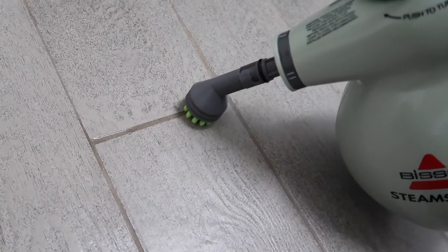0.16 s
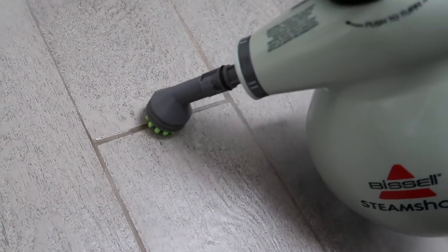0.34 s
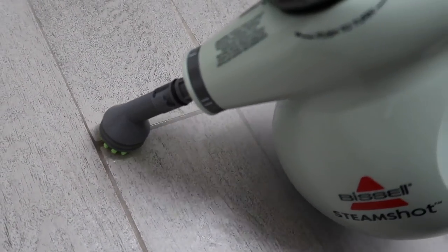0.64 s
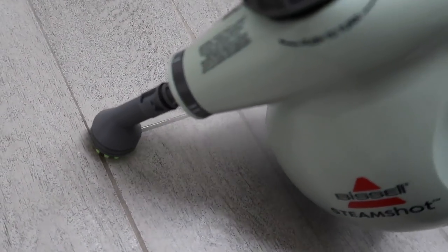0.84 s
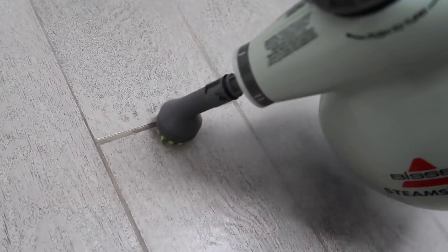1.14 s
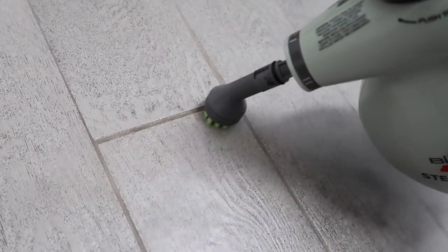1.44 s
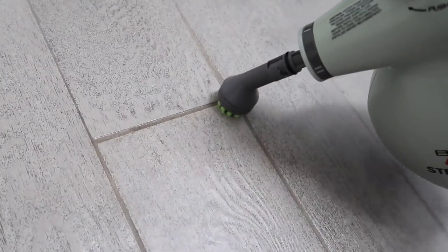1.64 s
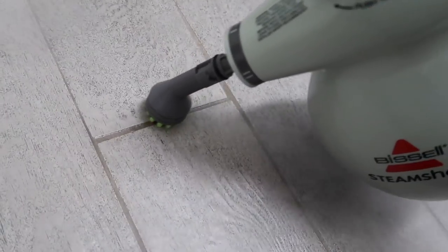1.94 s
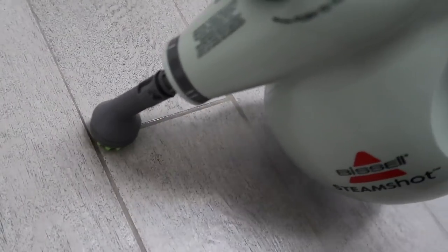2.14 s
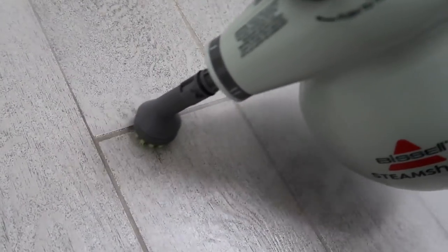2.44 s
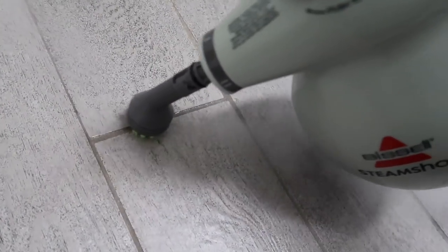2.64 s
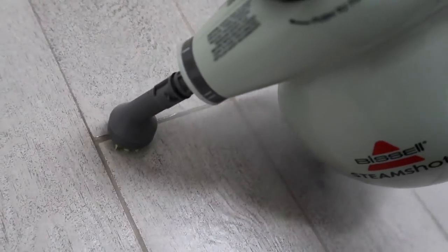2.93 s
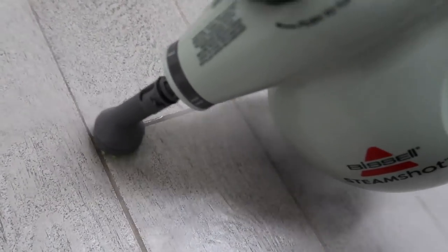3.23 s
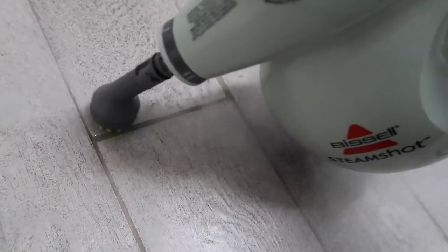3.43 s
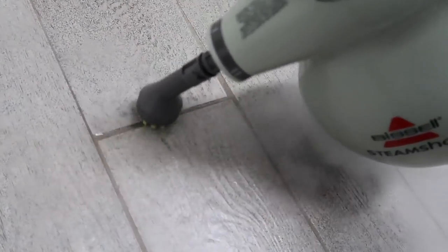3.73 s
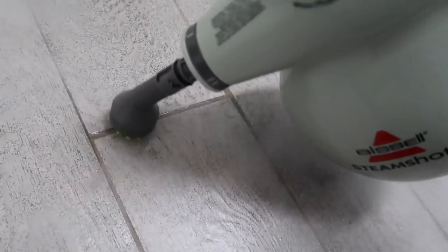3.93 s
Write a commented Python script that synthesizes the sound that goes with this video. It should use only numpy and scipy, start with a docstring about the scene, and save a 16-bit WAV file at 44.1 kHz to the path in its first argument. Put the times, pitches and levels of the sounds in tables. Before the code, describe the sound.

From 0 s a handheld steam cleaner is already running, its jet pushed through a small round brush against tile joints. The loud, bright, breathy hiss peaks around 3 to 4 kHz, with little bass, and continues to the end at about 4 s. It swells and eases gently every few tenths of a second, its treble shifting and fluttering, while fine drops sizzle densely over it. The lower roar thins gradually. Larger drops pop sharply near 0.57, 0.63, 0.86, 1.58 and 1.83 s. At about 3.35 s a tight burst of spits comes with a tiny pressure rise; the flow then suddenly drops, with a very faint hollow knock near 3.38 s. It stays weak briefly and recovers by about 3.9 s, with another pop near 3.86 s. The perspective is close, narrow stereo, with quick floor and shell reflections and a short, hard small-room tail.

```python
"""A steam cleaner scrubs the joint of a tiled floor in a small hard room, close to two microphone ports.
From the start its jet hisses through a round brush in slow surges, over a crackle of fine drops.
Floor and boiler shell echo every sound, and a short diffuse room tail follows.
Large drops pop from half a second on; near 3.4 s a slug of water cuts the flow, which slowly clears.
The hiss is shaped noise, the drops are short tone bursts, and the slug adds a faint hollow knock."""
import sys
import numpy as np
from scipy import signal
from scipy.fft import rfft, irfft
from scipy.io import wavfile
from scipy.ndimage import uniform_filter1d

SR = 44100
rng = np.random.default_rng(int(sys.argv[2]) if len(sys.argv) > 2 else 0)


def dump_mix(stems):
    """Bounce the given channels to the path in sys.argv[1] as a 16-bit WAV at rate SR."""
    frames = np.atleast_2d(stems).T  # one column per channel
    limited = np.clip(frames, -1, 1)  # hard clip at full scale
    pcm = np.round(limited * 32767).astype(np.int16)
    wavfile.write(sys.argv[1], SR, pcm)


def volts(x):
    """Linear amplitude factor 10**(x/20) for a level x in dB, scalar or array-like."""
    e = np.asarray(x, float) / 20
    return 10 ** e


N = 179795  # length in samples


def evened(x):
    """Scales to unit rms."""
    return x / np.sqrt(np.mean(x ** 2) + 1e-20)


def read(points, hz):
    """Reads a spectrum table on a log-frequency axis."""
    f, value = np.transpose(points)
    return np.interp(np.log(hz + 1), np.log(f + 1), value)


def add(mix, s, sound):
    """Mixes a sound in at time s."""
    part = mix[round(s * SR):][:len(sound)]
    part += sound[:len(part)]


# Surges of the steam jet: (time [s], flow level [dB, relative], treble level [dB, about its own mean])
JET_SURGES = [(0, -18.5, -3.5), (.22, -20.5, -2.5), (.42, -18.5, -4.5), (.72, -20, -4), (.82, -19.5, -4.5),
              (.94, -21, -2.5), (1.08, -18.5, -6), (1.25, -21.5, -1), (1.4, -18.5, -5), (1.55, -20, -3.5),
              (1.85, -18, -4), (2.05, -19, -4), (2.35, -19.5, -5), (2.85, -18.5, -4), (3.3, -19, -5.5),
              (4.08, -18.5, -7)]
CHOKE_S, CUT_S = 3.364, 0.006  # when the slug arrives, and how long the cut takes


def flow_db(t):
    """Steam flow: slow surges, the pressure peak before the slug, and the choke."""
    s, surge_db, _ = np.transpose(JET_SURGES)
    build_s, build_db, choke_db = 0.02, 0.5, -4.5
    build = np.interp(t - CHOKE_S, [-build_s, 0, CUT_S], [0, 1, 0])
    return np.interp(t, s, surge_db) + build_db * build + choke_db * choke(t)


def flow_gain():
    """Steam flow as a gain per sample."""
    return volts(flow_db(np.arange(N) / SR))


# Colour of the hiss through the brush cup: (frequency [Hz], level [dB per Hz, relative])
HISS_COLOUR = [(150, -37.5), (240, -28), (380, -31), (700, -17.5), (1300, -12), (2100, -11), (2800, -4),
               (3500, 2), (4500, -0.5), (6000, -4), (8000, -7), (12000, -11), (13500, -16), (15000, -20)]


def jet(over_db=2.5, patchy_db=0.6, flutter_db=0.8, roar_hz=2000, fizz_hz=6900):
    """Turbulent noise coloured by the brush cup; roar and fizz tilt its two ends, bristles make it flutter."""
    frames, hz = N // 128 + 5, np.fft.rfftfreq(512, 1 / SR)
    t = (np.arange(frames) * 128 - 256) / SR
    # The roar under the brush follows only a share of the flow and thins as the tile gets wet.
    roar_share, roar_db_per_s = 0.18, -1.27
    roar_db = roar_db_per_s * t - (1 - roar_share) * flow_db(t)
    roar_db = (roar_db - roar_db.mean())[:, None]
    # The choke tips the balance slightly towards the treble.
    s, _, treble_db = np.transpose(JET_SURGES)
    choke_treble_db = 0.5
    fizz_db = np.interp(t, s, treble_db) + choke_treble_db * choke(t)
    fizz_db = (fizz_db - fizz_db.mean())[:, None]

    real, imaginary, patches = rng.standard_normal((3, frames, len(hz)))
    patches = uniform_filter1d(patches, size=14, axis=0)  # smooth in time
    patches = evened(uniform_filter1d(patches, size=8, axis=1))  # smooth in frequency
    flutter = uniform_filter1d(rng.standard_normal(frames), size=8)
    # About 10-30 flutters a second, shared by the whole treble
    flutter = evened(flutter - uniform_filter1d(flutter, size=36))[:, None]

    low = 1 / (1 + (hz / roar_hz) ** 4)
    high = 1 / (1 + (fizz_hz / (hz + 1)) ** 4)
    field_db = low * roar_db + high * fizz_db
    field_db = field_db + patchy_db * patches + flutter_db * (1 - low) * flutter
    spectrum = (real + 1j * imaginary) * volts(field_db)
    noise = signal.istft(spectrum.T, nperseg=512, noverlap=384)[1][:N]
    colour = volts(read(HISS_COLOUR, np.fft.rfftfreq(N, 1 / SR)))
    hiss = irfft(rfft(noise) * colour, N)
    return volts(over_db) * flow_gain() * evened(hiss)


def pop(hz, cycles):
    """A few cycles under a quick smooth swell: a drop bursting."""
    turns = np.arange(round(cycles / hz * SR)) * hz / SR
    swell = np.sin(np.pi * np.sqrt(turns / cycles)) ** 2
    return np.sin(2 * np.pi * turns) * swell


def drops(per_s=260, spread_db=4.5, under_db=-13, cycles=4.6):
    """Fine drops crackle on the tile: short pops at one of twelve random pitches, a few large."""
    size_db = spread_db * np.minimum(rng.exponential(1, N), 4)
    size = volts(size_db) * (rng.random(N) < per_s / SR)
    kind = rng.integers(0, 12, N)
    crackle = np.zeros(N)
    for k, hz in enumerate(np.geomspace(2700, 9500, num=12)):
        crackle += signal.oaconvolve(size * (kind == k), pop(hz, cycles))[:N]
    return volts(under_db) * flow_gain() * evened(crackle)


# First reflections from floor and boiler shell: (delay [ms], signed gain [ratio])
REFLECTIONS = [(1.69, -0.0053), (1.96, -0.00019), (3.74, 0.091), (5.69, 0.041), (6.09, 0.024),
               (8.31, -0.032)]
# Cancellations between nozzle and floor: (frequency [Hz], half-width [Hz], depth [dB])
FLOOR_DIPS = [(198, 16, -6.5), (528, 15, -7.5), (920, 170, -4), (1518, 95, -7), (2060, 200, -3),
              (3126, 317, -3)]


def echoed(x):
    """Adds the first reflections from floor and shell, and the floor's cancellations."""
    hz = np.fft.rfftfreq(N, 1 / SR)
    comb = 1 + sum(g * np.exp(-2j * np.pi * hz * ms / 1000) for ms, g in REFLECTIONS)
    dips_db = sum(db / (1 + ((hz - f) / width) ** 2) for f, width, db in FLOOR_DIPS)
    return irfft(rfft(x) * comb * volts(dips_db), N)


# Decay and colour of the room: (frequency [Hz], 60 dB decay time [s], tail level [dB, relative])
ROOM_TAIL = [(310, 0.12, -0.5), (3100, 0.19, -1), (8900, 0.09, 4), (14000, 0.045, 10)]


def room(x, turns=3.3, start_s=0.009, gap_m=0.01):
    """Diffuse tails, alike at both ports as a sinc of their gap; they change as the nozzle moves."""
    hz, t, z = signal.stft(rng.standard_normal((9, 2, SR // 2)), SR, nperseg=256)
    same = np.sinc(2 * hz * gap_m / 343)[:, None]  # 343 m/s: speed of sound
    z[:, 1] = same * z[:, 0] + np.sqrt(1 - same ** 2) * z[:, 1]
    t60 = read([row[:2] for row in ROOM_TAIL], hz)[:, None]
    z *= volts(-60 * t / t60) * (t > start_s)
    z /= np.sqrt((abs(z) ** 2).sum(axis=3).mean(axis=(0, 1)))[:, None]  # flat energy over frequency
    z *= volts(read([row[::2] for row in ROOM_TAIL], hz))[:, None]  # then the room's colour
    tails = signal.istft(z, SR, nperseg=256)[1]
    # Three sets of three tails fade into one another, each set at its own rate.
    k = np.arange(9)[:, None]
    place = 2 * np.pi * (turns * (1 + k // 3) * np.arange(N) / N + k / 3)
    wet = np.zeros((2, N))
    for p, tail in zip(place, tails):
        wet += signal.fftconvolve((x * np.cos(p))[None], tail, axes=1)[:, :N]
    return evened(wet) * np.std(x)


# The largest spits of water: (time [s], level [dB, relative], pitch [Hz])
LARGE_DROPS = [(0.5694, -8, 3820), (0.6254, -8, 3440), (0.8574, -7, 3440), (1.5774, -7, 4470),
               (1.8294, -6, 3750), (3.3498, -9, 3410), (3.3574, -5, 3650), (3.3614, -7, 3870),
               (3.3694, -9, 3820), (3.8554, -6, 3720)]


def spits(cycles=7.0):
    """Large drops pop in the brush cup, each a short burst at its own pitch."""
    out = np.zeros(N)
    for s, db, hz in LARGE_DROPS:
        add(out, s, volts(db) * pop(hz, cycles))
    return out


def choke(t):
    """How far the slug blocks the jet, 0-1: a sudden cut, a weak spell, a slow clearing."""
    weak_s, clear_s = 0.068, 0.45
    return np.interp(t - CHOKE_S, np.cumsum([0, CUT_S, weak_s, clear_s]), [0, 1, 1, 0])


def ring(hz, t60, rise=3):
    """A struck mode: a decaying sine with a soft start."""
    t = np.arange(round(t60 * SR)) / SR
    return volts(-60 * t / t60) * np.sin(2 * np.pi * hz * t) * (1 - np.exp(-rise * hz * t))


# Hollow knock as the slug leaves the tube: (time [s], level [dB, relative])
SLUG_KNOCK = (3.384, -43.5)
# Modes of the tube: (frequency [Hz], level [dB, relative to the knock], 60 dB decay time [s])
TUBE_MODES = [(250, 0, 0.2), (452, -9, 0.1), (716, -7, .08)]


def knock():
    """The choking slug knocks faintly in the tube, ringing its modes."""
    out = np.zeros(N)
    s, knock_db = SLUG_KNOCK
    for hz, db, t60 in TUBE_MODES:
        add(out, s, volts(knock_db + db) * ring(hz, t60))
    return out


def scene():
    """Direct sound reaches the left port first; the right port's cavity lifts the middle treble."""
    near = echoed(jet() + drops() + spits() + knock())
    lag_s, lift_db, lift_hz, room_db = 3.6e-5, 2, 5300, -5
    hz = np.fft.rfftfreq(N, 1 / SR)
    lift = volts(lift_db / (1 + (np.log(hz / lift_hz + 1e-9) / 2.4) ** 2))
    right = irfft(rfft(near) * lift * np.exp(-2j * np.pi * hz * lag_s), N)
    return volts(-0.97) * (np.array([near, right]) + volts(room_db) * room(near))


def roll_off(x):
    """The treble ends steeply here."""
    return signal.sosfilt(signal.butter(12, 15720, fs=SR, output="sos"), x)


def record(dry):
    """The microphone loses bass and top."""
    low_hz, top_hz = 165, 15900
    mix = signal.sosfilt(signal.butter(2, low_hz, "high", fs=SR, output="sos"), dry)
    mix = signal.oaconvolve(mix, signal.firwin(401, top_hz, fs=SR)[None], "same")
    return roll_off(mix)


dry = scene()
out = record(dry)
dump_mix(out)
```